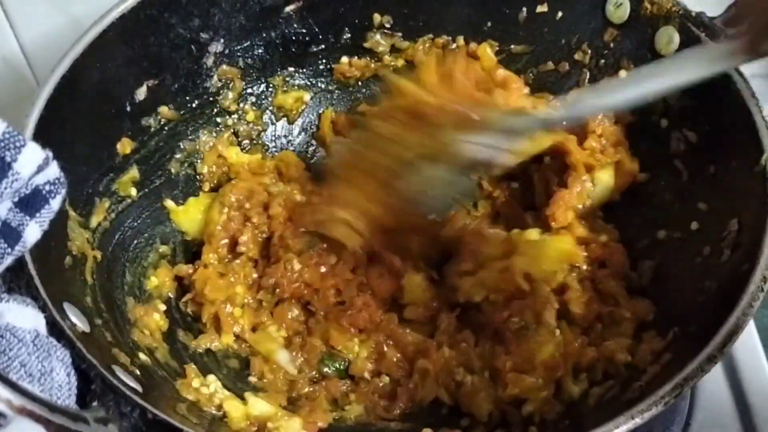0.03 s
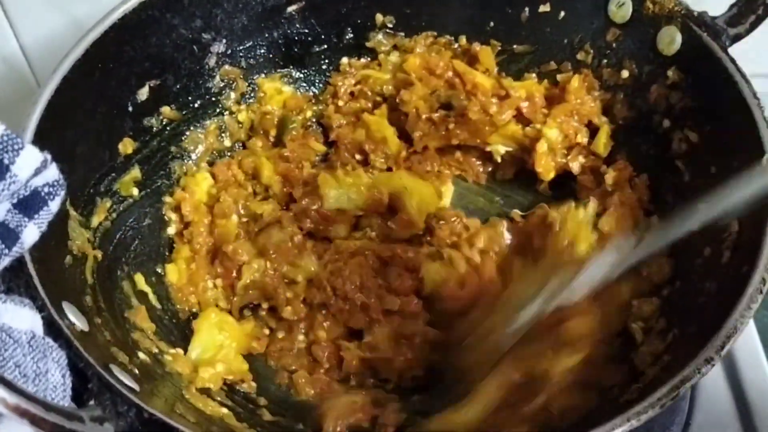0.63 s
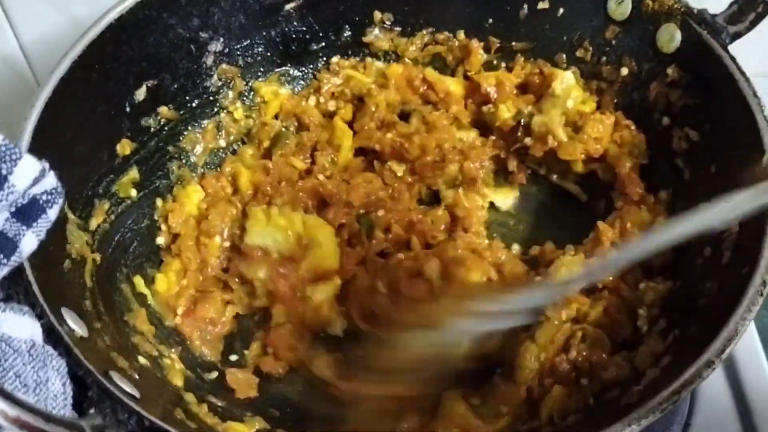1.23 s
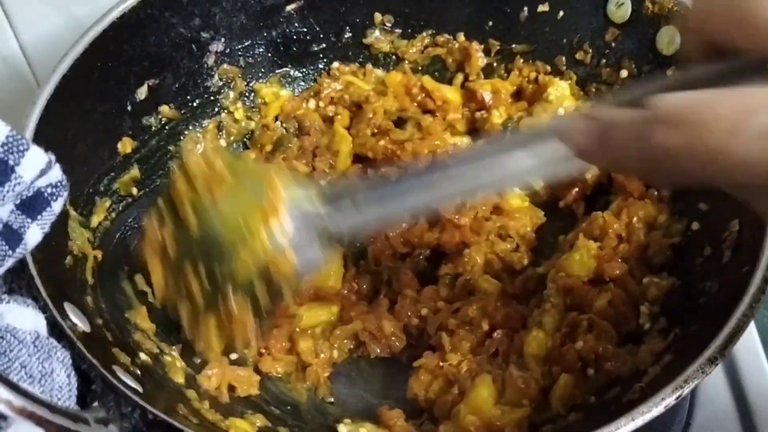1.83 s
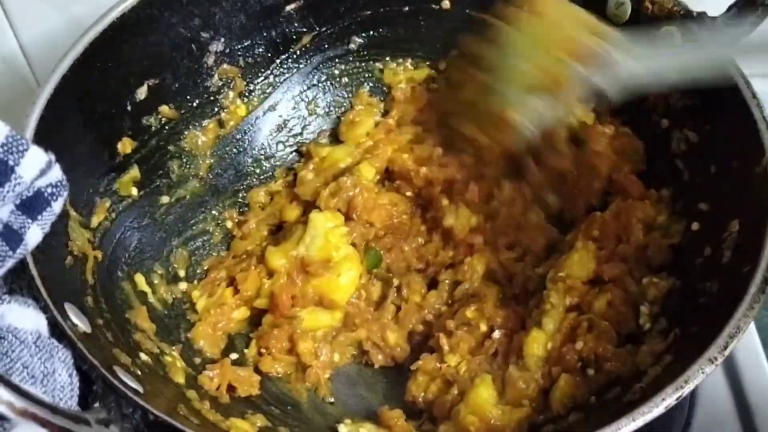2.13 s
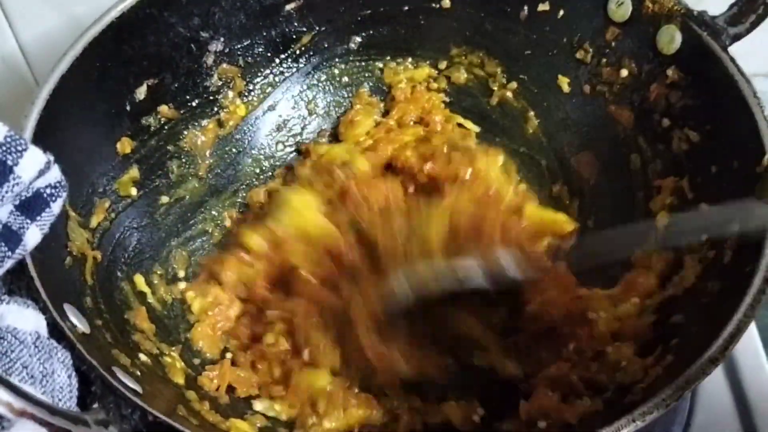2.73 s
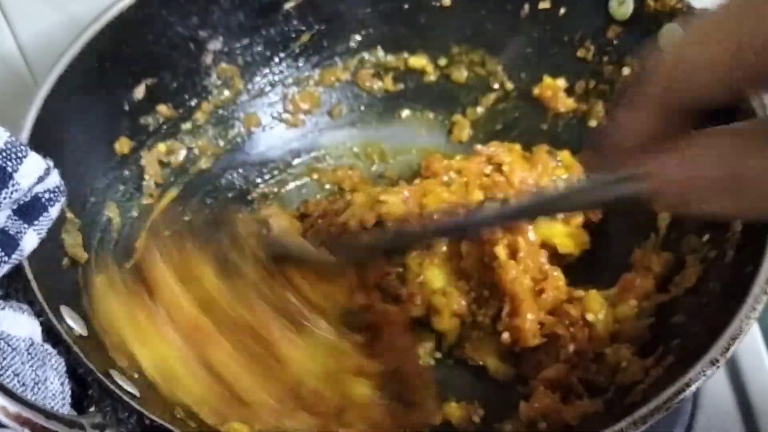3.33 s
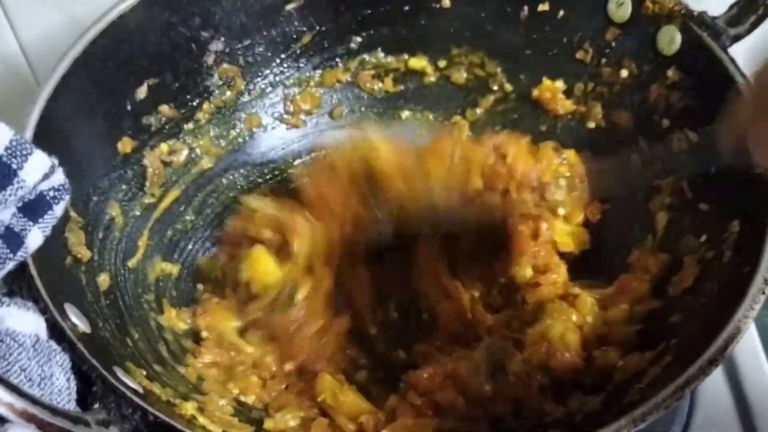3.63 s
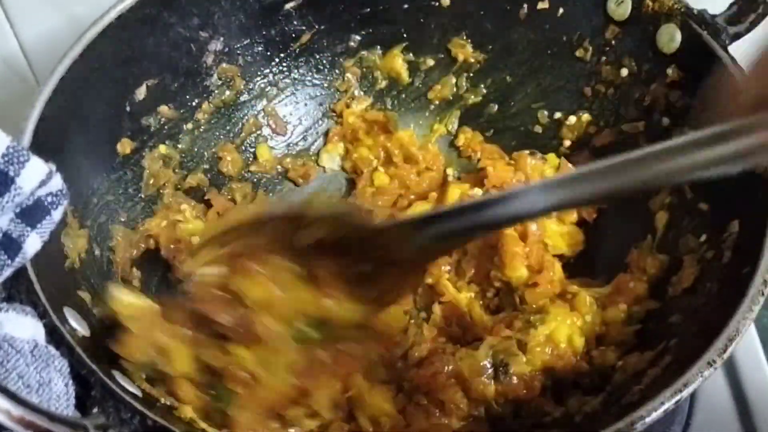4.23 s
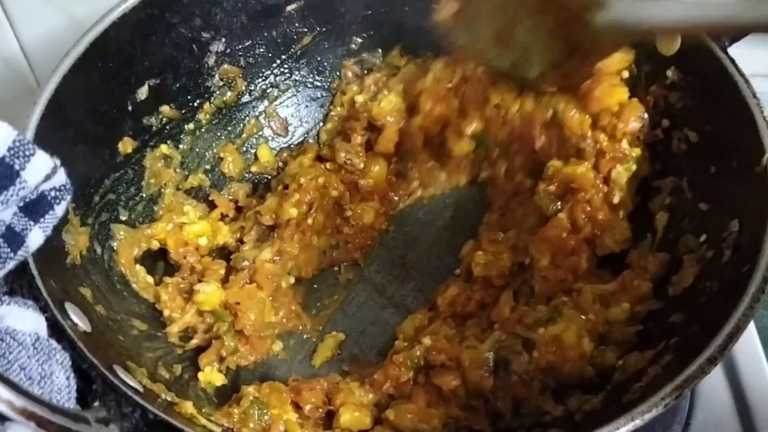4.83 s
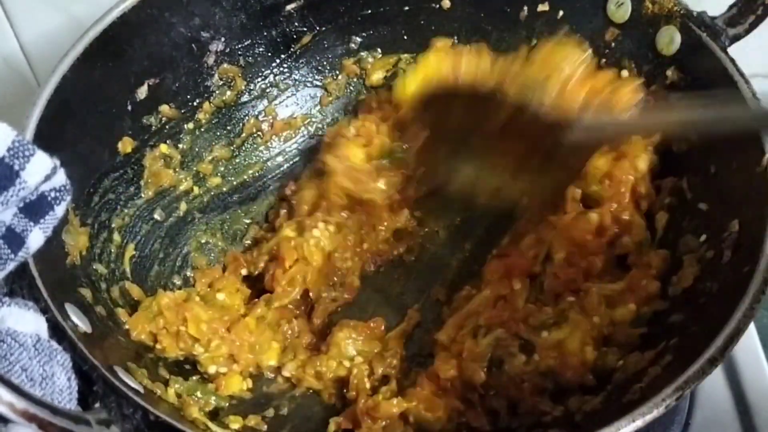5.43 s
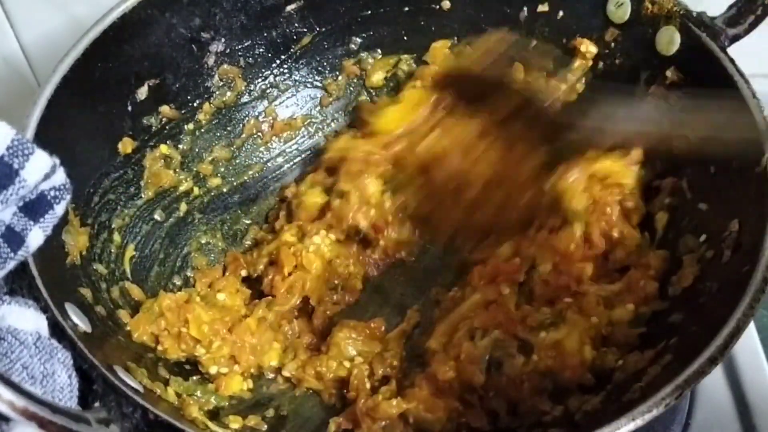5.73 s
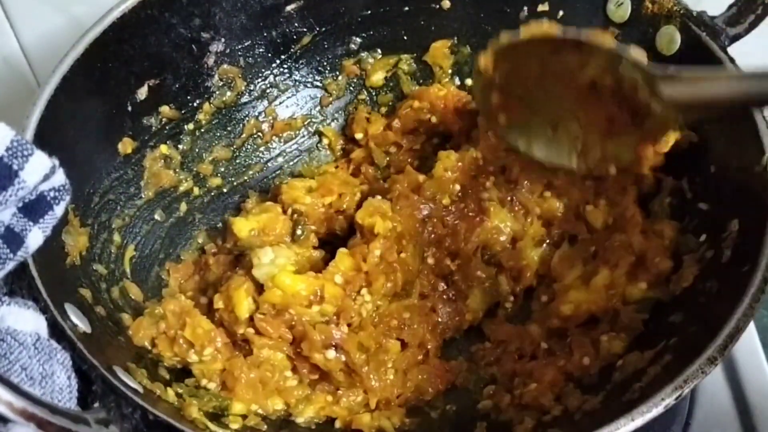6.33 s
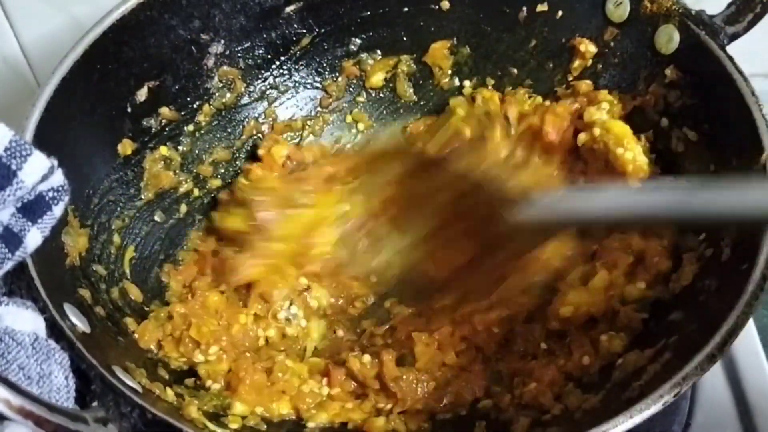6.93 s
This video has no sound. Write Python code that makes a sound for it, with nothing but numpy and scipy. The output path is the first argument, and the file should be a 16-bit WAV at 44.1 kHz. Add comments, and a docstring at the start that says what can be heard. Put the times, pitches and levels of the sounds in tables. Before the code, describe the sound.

A steel spoon stirs mashed vegetables in a deep metal pan, heard from just above it in a small kitchen. For the first two seconds, gritty, juddering scrapes follow each other quickly, mixed with blunt thuds in the mash and short metallic knocks, the strongest at about 0.7, 1.2 and 1.7 seconds. From around 2.5 seconds the strokes are lighter and more spaced, a rasp or thud roughly every half second, with sharper knocks near 4.3 and 5.1 seconds. At 6 seconds a bright clang leaves the spoon ringing briefly. The pan rocks with two soft thuds, and a quiet, low scrape follows near 7 seconds. Underneath, a low gas flame, a soft sizzle and a faint hum run throughout, with tiny spits of oil at about 3 and 5 seconds.

```python
"""A steel spoon stirs mashed vegetables in a deep metal pan on a gas ring, in a small kitchen.
Each knock is an impact that excites the pan's damped modes. Softer impacts, spread out in time, give
blunt thuds: the spoon landing in mash, and the pan rocking just after the last clang.
As the spoon is pushed along, stick-slip friction drives the same modes.
Underneath, bursting bubbles sizzle softly and now and then spit, over the low flame and a faint hum."""
import sys
import numpy as np
from scipy import signal
from scipy.fft import rfft, irfft
from scipy.io import wavfile
from scipy.ndimage import uniform_filter1d

SR = 44100
rng = np.random.default_rng(int(sys.argv[2]) if len(sys.argv) > 2 else 0)


def digitize_waveform(pressure):
    """Quantize a signal to 16-bit integers and store it at the path in sys.argv[1].

    Rows of a 2-D input are taken as channels; values are limited to [-1, 1].
    """
    field = np.atleast_2d(pressure).T
    bounded = np.clip(field, -1, 1)
    quanta = np.round(bounded * 32767).astype(np.int16)
    wavfile.write(sys.argv[1], SR, quanta)


N = 312316
TIME = np.arange(N) / SR
RING_TIME = TIME[:SR // 3]

# Spectrum of the flame and simmering mash. Each row: frequency in Hz, relative density in dB.
SIMMER_SPECTRUM = [(40, -33), (87, -8.5), (247, -14), (368, -3), (427, -8), (998, -10.5), (1300, -12.5),
                   (2110, -22.5), (2840, -20), (4000, -22.5), (5000, -31.5), (7800, -35.5), (9400, -48.5),
                   (15500, -54)]
# Single spits of hot oil. Each row: start in seconds, peak level in dB.
OIL_SPITS = [(2.97, -46), (4.999, -52.5)]
# The pan's distinct modes. Each row: frequency in Hz, relative level in dB, 60 dB decay time in seconds.
PAN_RESONANCES = [(274.7, -10.5, 0.3), (430, -6.5, 0.18), (499.4, -4, 0.18), (674.6, 1.5, 0.25),
                  (714, 9, 0.11), (876, -5, 0.16), (923, -5, 0.18), (1260, -1.5, 0.12), (1382, -1, 0.12),
                  (1540, -1, 0.065)]
# Its crowd of weaker modes, blurred by the walls. Each row: frequency in Hz, relative density in dB.
DIFFUSE_SPECTRUM = [(150, -27), (275, -3.5), (360, -4.5), (450, 0.5), (750, 5), (1350, 0), (2500, -4.5),
                    (3300, -11.5), (4000, -5.5), (5000, -10.5), (6800, -9.5), (8500, -5.5), (15500, -16.5)]
# The free spoon's modes. Each row: frequency in Hz, relative level in dB, 60 dB decay time in seconds.
SPOON_RESONANCES = [(1879, -7, .18), (2410, -3, .2), (2537, -3, .18), (2594, -5, .18), (2700, -5, .18),
                    (2941, -4, .14), (3127, -4, .14), (3909, -9, .16), (6224, -9, .18), (6465, -10, .19),
                    (6627, -10, .21)]
# Pushes of the spoon. Each row: start in seconds, length in seconds, levels in dB of the four registers
# (thud of the mash, groan of the bowl, grind, rasp of the edge), swell from start to end in dB.
PUSHES = [(0.0, 0.005, -38.5, -13.5, -35, -24.5, -13.5), (0.049, 0.11, -47.5, -28, -37, -39.5, 8.5),
          (0.243, 0.14, -55.5, -26, -32.5, -35.5, 7.5), (0.604, 0.047, -33, -35, -34, -48.5, -3.5),
          (0.708, 0.15, -57, -27.5, -44.5, -46.5, -16.5), (0.798, 0.047, -46.5, -28, -29.5, -39.5, 16),
          (0.939, 0.15, -48, -25, -29.5, -36.5, -6), (1.11, 0.058, -46, -21, -26, -37, 2.5),
          (1.25, 0.12, -45, -30, -29, -44.5, -9), (1.32, 0.12, -59.5, -35, -35.5, -53.5, 20.5),
          (1.828, 0.13, -50.5, -34.5, -47.5, -41, 1), (1.981, 0.081, -53, -26.5, -37, -42, -3),
          (2.073, 0.096, -52, -25, -30, -39, 5), (2.589, 0.12, -58, -33, -34, -40.5, 2),
          (2.98, 0.093, -60, -69, -51, -56.5, 15), (3.115, 0.12, -44.5, -43, -41, -42.5, -1),
          (3.48, 0.13, -54.5, -30.5, -42.5, -36, 5), (3.911, 0.091, -55, -45, -39, -37, 13),
          (4.807, 0.11, -45, -44, -39.5, -37, 13.5), (5.221, 0.052, -51, -37, -43.5, -37, -2.5),
          (5.576, 0.1, -52.5, -46, -50.5, -47.5, 14), (6.947, 0.16, -48.5, -51, -69, -75, -7)]
# The edge judders around one pitch. Each row: middle in seconds, length in seconds, pitch in Hz,
# level in dB.
EDGE_JUDDERS = [(0.101, 0.086, 585, -22.5), (0.316, 0.067, 2300, -40.5), (0.384, 0.044, 743, -20.5),
                (0.628, 0.041, 426, -30), (1.036, 0.065, 810, -25), (1.081, 0.028, 750, -22),
                (1.924, 0.09, 647, -25), (2.017, 0.1, 1850, -37), (2.654, 0.18, 4440, -37),
                (3.204, 0.088, 712, -34.5), (3.226, 0.09, 400, -39), (3.557, 0.12, 3640, -36),
                (3.578, .11, 857, -36.5), (3.94, 0.074, 2330, -34.5), (4.844, 0.088, 3340, -34),
                (4.917, 0.079, 686, -31), (5.256, 0.07, 3700, -37), (4.866, 0.069, 7450, -37),
                (5.635, 0.13, 3290, -43.5), (6.422, 0.022, 2550, -45), (6.422, 0.053, 4340, -50)]
# Soft, blunt thuds: the spoon landing in mash, and the pan rocking just after the last clang.
# Each row: start in seconds, base level in dB, hardness in dB gained from each register to the next,
# favoured pitch in Hz, its lift in dB.
SOFT_THUDS = [(0.047, -38, 2, 720, 11), (0.559, -35.5, -4.5, 430, 2), (0.898, -32, -1, 455, 7),
              (0.932, -20, 1, 475, 4), (1.23, -32.5, 0.5, 430, 6), (1.7, -28.5, 0.5, 281, 11.5),
              (1.73, -32, -8, 610, 6.5), (1.848, -45.5, -19, 310, 21), (2.556, -32, 1.5, 503, 4),
              (2.941, -37, -1.5, 530, -4), (3.43, -32.5, 1.5, 1220, 5), (3.827, -42.5, -1.5, 402, 16),
              (3.909, -32.5, -1, 402, 6.5), (4.243, -42, -2, 443, 6), (4.281, -30, 0.85, 436, 5),
              (4.51, -45.5, -2.5, 404, 4), (5.206, -44, -2.5, 890, 20), (5.54, -34, -6, 400, 5.5),
              (5.996, -37, 5.5, 436, 7), (6.394, -34, 1, 730, 2.5), (6.633, -47, -3.5, 383, 2)]
# Bare steel on the pan. Each row: start in seconds, contact time in seconds, levels in dB of thud,
# groan, grind and rasp, pitch of the struck spot in Hz, its peak level in dB.
STEEL_KNOCKS = [(.072, 0.0016, -49, -26.5, -41, -49, 3720, -26),
                (0.2098, 0.0015, -44, -37, -36.5, -49, 2480, -29.5),
                (0.276, 0.011, -58, -48, -31, -44, 1630, -30),
                (0.4502, 0.0026, -41, -33.5, -49.5, -58.5, 878, -26),
                (.537, 0.0021, -51, -59, -51.5, -52.5, 1710, -42),
                (.698, .004, -46, -27, -40.5, -44, 715, -16),
                (.867, 0.00084, -47, -45, -42, -44, 3750, -24),
                (0.9195, 0.00092, -33, -45, -27, -53, 2170, -27),
                (1.249, 0.002, -31.5, -33.5, -24.5, -38.5, 1970, -18),
                (1.392, 0.0048, -49, -32.5, -38, -36, 701, -19.5),
                (1.697, 0.0047, -24, -21.5, -36, -28, 676, -13),
                (3.472, 0.012, -55, -40, -26, -44, 1587, -28),
                (4.3442, 0.0019, -30, -26.5, -28.5, -44, 2450, -19),
                (4.799, 0.0024, -42.5, -37.5, -44, -52, 3700, -31.5),
                (5.1346, 0.001, -46.5, -54, -35, -56, 1240, -19.5),
                (5.142, 0.0014, -36.5, -48, -35, -66, 1250, -24),
                (5.536, 0.0019, -51, -33, -59, -55, 596, -39),
                (5.9872, .001, -56, -36.5, -26.5, -23, 2860, -12.5)]
# The three boundaries between thud, groan, grind and rasp, in Hz.
CROSSOVERS_HZ = [600, 1100, 3300]
# Mash piles up before the spoon. Each entry: one register's change along a push in dB.
PILE_UP_DB = [11, 0, -5, -1.5]
# The pan rings out once the spoon lifts. Each entry: one register's decay in dB per second.
DECAY_DB_PER_S = [167, 318, 406, 400]
# Timbre of a soft impact. Each entry: one register's offset in dB.
SOFT_TIMBRE_DB = [-2.5, -3.5, -9, -16]
# The band in which bursting bubbles sound: lower and upper edge in Hz.
BUBBLE_BAND_HZ = [5800, 8700]


def from_db(db):
    """Amplitude ratio of a level in dB."""
    return 10 ** (np.asarray(db) / 20)


def rms_one(x):
    """Normalisation to unit rms."""
    return x / np.sqrt(np.mean(x ** 2) + 1e-20)


def even(x, steady_s=0.044):
    """Division by the running rms holds the level at 1 and leaves the fine grain."""
    return x / np.sqrt(np.abs(uniform_filter1d(x ** 2, int(steady_s * SR))) + 1e-12)


def cut(x, hz, kind, order=4):
    """Butterworth filter."""
    return signal.sosfilt(signal.butter(order, hz, kind, fs=SR, output="sos"), x + 1e-18)


def coloured_noise(spectrum, size):
    """Spectral shaping of white noise, at unit rms."""
    hz, db = np.transpose(spectrum)
    bins = np.maximum(np.fft.rfftfreq(size, 1 / SR), 1)
    gain = from_db(np.interp(np.log(bins), np.log(hz), db))
    return rms_one(irfft(rfft(rng.standard_normal(size)) * gain, size))


def drift(per_s):
    """Linear interpolation between random values: a wander of spread about 1."""
    knots = np.arange(0, TIME[-1] + 1, 1 / per_s)
    return np.interp(TIME, knots, rng.standard_normal(len(knots)))


def clicks(per_s, spread_db, size):
    """A Poisson train of impulses of uneven size and sign."""
    born = rng.random(size) < per_s / SR
    strength = from_db(spread_db * np.clip(rng.standard_normal(size), -2, 2))
    return born * strength * rng.choice([-1, 1], size)


def frying(simmer_db=-54.5, sizzle_db=-78, hum_db=-65, hum_hz=166.2, half_width_hz=7):
    """Broadband noise of flame and steam, shot noise of bursting oil bubbles, and a narrow-band hum."""
    simmer = coloured_noise(SIMMER_SPECTRUM, size=N)
    bursts = clicks(per_s=60, spread_db=6, size=N)
    sizzle = rms_one(cut(bursts, BUBBLE_BAND_HZ, "band", order=6))
    hum_band = [hum_hz - half_width_hz, hum_hz + half_width_hz]
    hum = rms_one(cut(rng.standard_normal(N), hum_band, "band", order=2))
    return from_db(simmer_db) * simmer + from_db(sizzle_db) * sizzle + from_db(hum_db) * hum


def spits(snap_s=0.0021, tail_s=0.063, tail_db=-17):
    """A larger bubble bursts as a noise transient: a dry snap, then a short echo from the pan."""
    out = np.zeros(N)
    envelope = np.exp(-RING_TIME / snap_s) + from_db(tail_db) * np.exp(-RING_TIME / tail_s)
    for start, db in OIL_SPITS:
        snap = cut(envelope * rng.standard_normal(len(envelope)), BUBBLE_BAND_HZ, "band")
        add(out, start, from_db(db) * snap / np.abs(snap).max())
    return out


def add(out, start_s, sound):
    """Superposition: mix a sound in from the given time."""
    start = round(start_s * SR)
    sound, start = sound[max(-start, 0):], max(start, 0)
    out[start:start + len(sound)] += sound[:N - start]


def modes(table, spread_db, detune_hz):
    """Free vibration is a sum of damped sines, unevenly excited; clinging mash detunes them."""
    hz, db, t60 = np.transpose(table)[:, :, None]
    strength = from_db(db + spread_db * rng.standard_normal(hz.shape)) * rng.choice([-1, 1], hz.shape)
    hz = hz + detune_hz * rng.standard_normal(hz.shape)
    decay = np.exp(-np.log(1000) * RING_TIME / t60)
    return np.sum(strength * np.sin(2 * np.pi * hz * RING_TIME) * decay, axis=0)


def pan_ring(cluster_db, cluster_hz=200, diffuse_db=4.0, diffuse_t60=0.22, top_hz=7450, shelf_db=-22):
    """The pan's impulse response: a short crack, its distinct modes and the crowd of weaker ones."""
    size = len(RING_TIME)
    # each point of contact favours its own clusters of modes
    knots = np.arange(0, SR / 2, cluster_hz)
    ripple = np.interp(np.fft.rfftfreq(size, 1 / SR), knots, rng.standard_normal(len(knots)))
    spectrum = rfft(coloured_noise(DIFFUSE_SPECTRUM, size)) * from_db(cluster_db * ripple)
    crowd = from_db(diffuse_db) * rms_one(irfft(spectrum, size))
    crack = 2.1 * np.exp(-RING_TIME / .002)
    envelope = np.exp(-np.log(1000) * RING_TIME / diffuse_t60) + crack
    distinct = modes(PAN_RESONANCES, spread_db=4.0, detune_hz=11.1)
    ring = cut(distinct + envelope * crowd, 245, "high", order=3)
    top_octave = from_db(shelf_db) * cut(ring, np.sqrt(2) * top_hz, "high")
    return cut(ring, top_hz, "low", order=14) + top_octave


def registers(x):
    """A crossover splits the pan's sound into thud, groan, grind and rasp."""
    low, middle, high = CROSSOVERS_HZ
    return [cut(x, low, "low", order=8), cut(x, [low, middle], "band", order=3),
            cut(x, [middle, high], "band"), cut(x, high, "high", order=6)]


def friction(slips_per_s=210, wander=.45, slip_spread_db=2.5, grit_per_s=2000, catch_db=1.64):
    """Stick-slip force: uneven jerks and fine grit under the spoon's edge, bunched into brief catches."""
    slip_rate = slips_per_s * np.exp(wander * (drift(14) + drift(250)))
    cycles = np.cumsum(slip_rate) / SR
    strength = from_db(slip_spread_db * np.clip(rng.standard_normal(N), -2, 2))
    slips = np.diff(np.floor(cycles), prepend=0) * strength
    grit = clicks(grit_per_s, spread_db=6, size=N)
    return (rms_one(slips) + rms_one(grit)) * from_db(catch_db * drift(140))


def rubbed_pan(spots_per_s=20, count=24):
    """Forced vibration: friction is convolved with the response of each spot that the spoon passes."""
    force, travel = friction(), TIME * spots_per_s
    sound = np.zeros(N)
    for spot in range(count):
        nearness = np.maximum(1 - np.abs((travel - spot) % count - 1), 0)
        sound += signal.oaconvolve(force * nearness, pan_ring(cluster_db=6.0))[:N]
    return sound


def push_gains(bite_s=0.018, arch_db=4.5):
    """Register envelopes: each push bites, arches, darkens and rings out; overlaps add in power."""
    power = np.zeros((len(PILE_UP_DB), N))
    t = TIME[:SR // 2] - bite_s
    bite = np.clip(1 + t / bite_s, 0, 1)
    for start, length_s, *levels_db, swell_db in PUSHES:
        along = np.clip(t / length_s, 0, 1) - .5
        pressure_db = swell_db * along - arch_db * (2 * along) ** 2   # the hand bears down mid-push
        lifted_s = np.maximum(t - length_s, 0)
        for register, db, darken_db, fall in zip(power, levels_db, PILE_UP_DB, DECAY_DB_PER_S):
            gain = bite * from_db(db + pressure_db + darken_db * along - fall * lifted_s)
            add(register, start - bite_s, gain ** 2)
    return np.sqrt(power)


def scraping(sag_octaves=0.12, relative_width=.11):
    """Pushes modulate the rubbed pan; a judder lifts a cluster of modes, sinking as mash gathers."""
    rubbed = rubbed_pan()
    out = sum(gain * even(part) for part, gain in zip(registers(rubbed), push_gains()))
    for middle, length_s, hz, db in EDGE_JUDDERS:
        near = np.abs(TIME - middle) < length_s
        along = np.clip((TIME[near] - middle) / length_s, -.5, .5)
        pitch_hz = hz * 2 ** (-sag_octaves * along)
        # a gliding band-pass: shift the pitch to 0 Hz, low-pass, shift back
        carrier = np.exp(2j * np.pi * np.cumsum(pitch_hz) / SR)
        baseband = cut(rubbed[near] / carrier, relative_width * hz, "low", order=3)
        cluster = even(np.real(carrier * baseband), steady_s=0.016)
        out[near] += from_db(db) * np.cos(np.pi * along) * cluster
    return out


def blow(force, ring, levels_db, onset_s=.03):
    """Convolution of a contact force with the pan's response; register levels hold for the onset."""
    onset = round(onset_s * SR)
    parts = registers(signal.fftconvolve(force, ring)[:len(ring)])
    return sum(from_db(db) * part / np.std(part[:onset]) for part, db in zip(parts, levels_db))


def soft_thuds(swell_s=0.0063, grains_per_s=1500, spot_width=0.076):
    """Soft impact of spoon in mash or of the rocking pan: a brief crunch, brighter when harder."""
    out = np.zeros(N)
    for start, level_db, hardness_db, spot_hz, lift_db in SOFT_THUDS:
        grains = clicks(grains_per_s, spread_db=4.5, size=len(RING_TIME))
        crunch = grains * RING_TIME * np.exp(-RING_TIME / swell_s)
        levels_db = [level_db + db + step * hardness_db for step, db in enumerate(SOFT_TIMBRE_DB)]
        sound = blow(crunch, pan_ring(cluster_db=4.0), levels_db)
        favoured = cut(sound, spot_hz * np.exp([-spot_width, spot_width]), "band", order=1)
        add(out, start, sound + (from_db(lift_db) - 1) * favoured)
    return out


def knocks(skid_db=-8, skids_per_s=1500, spoon_db=-19.5):
    """Hard impact: an impulse and a short skid ring the pan, and the struck spot sounds its pitch."""
    out = np.zeros(N)
    for start, contact_s, *levels_db, spot_hz, spot_db in STEEL_KNOCKS:
        age = RING_TIME / contact_s
        skid = from_db(skid_db) * clicks(skids_per_s, spread_db=3, size=len(age)) * np.exp(-age)
        force = (age == 0) + skid
        spot = from_db(spot_db) * age * np.exp(1 - age) * np.sin(2 * np.pi * spot_hz * RING_TIME)
        add(out, start, blow(force, pan_ring(cluster_db=0.0, diffuse_t60=0.18), levels_db) + spot)
    # after the last knock the spoon vibrates freely
    spoon = modes(SPOON_RESONANCES, spread_db=1, detune_hz=0)
    add(out, STEEL_KNOCKS[-1][0], from_db(spoon_db) * spoon)
    return out


def scene():
    """Superposition of spoon and stove, heard in one channel from just above the pan."""
    return (knocks() + soft_thuds() + scraping() + frying() + spits())[None]


def record(dry, cutoff_hz=15800):
    """Soft saturation rounds the loudest peaks, and a steep low-pass cuts the top."""
    return signal.sosfilt(signal.ellip(10, .1, 80, cutoff_hz, fs=SR, output="sos"), np.tanh(dry))


dry = scene()
out = record(dry)
digitize_waveform(out)
```